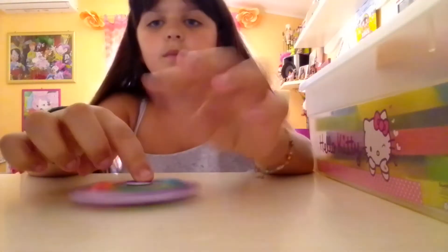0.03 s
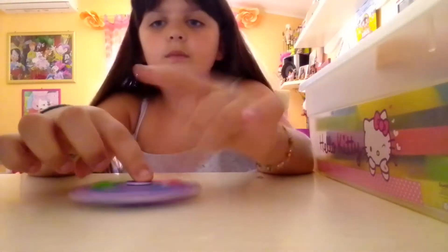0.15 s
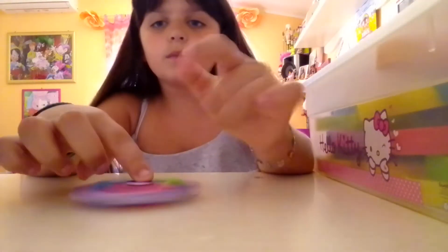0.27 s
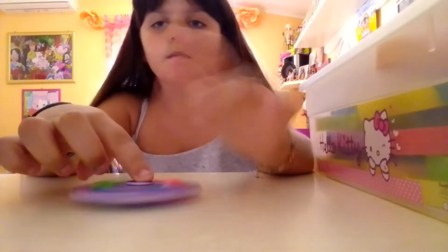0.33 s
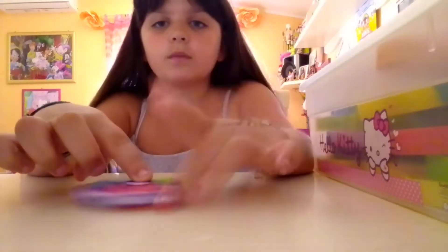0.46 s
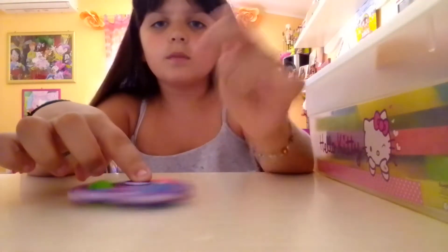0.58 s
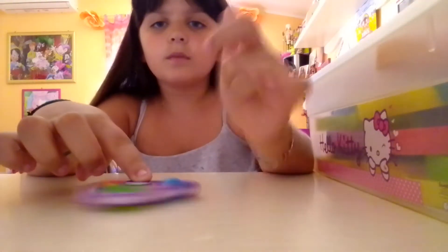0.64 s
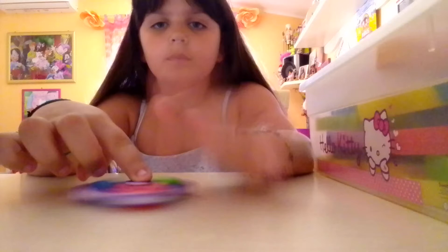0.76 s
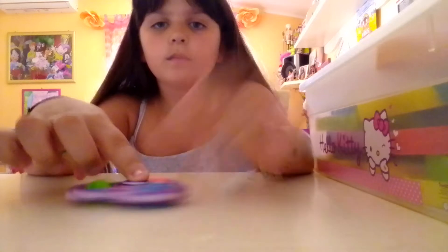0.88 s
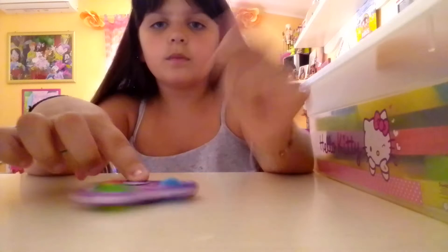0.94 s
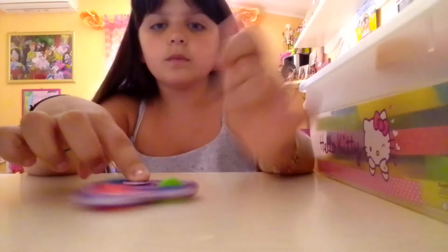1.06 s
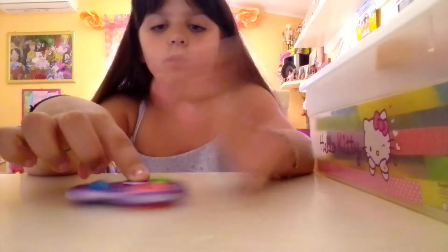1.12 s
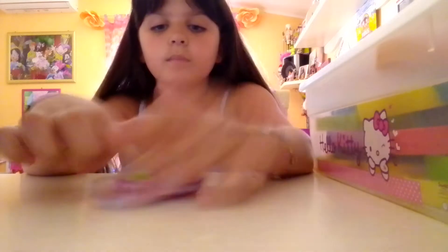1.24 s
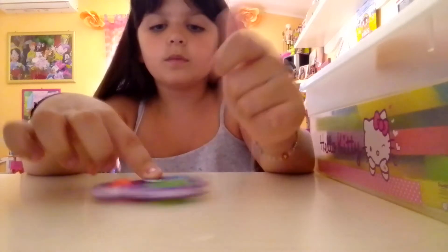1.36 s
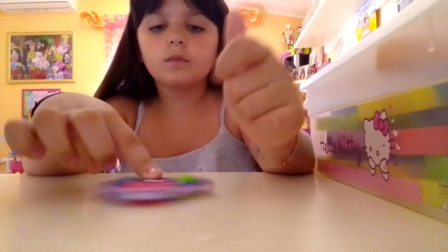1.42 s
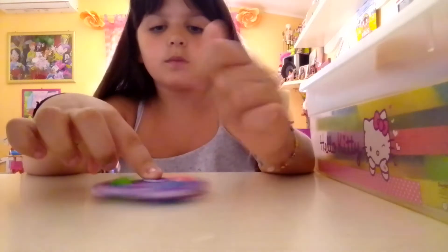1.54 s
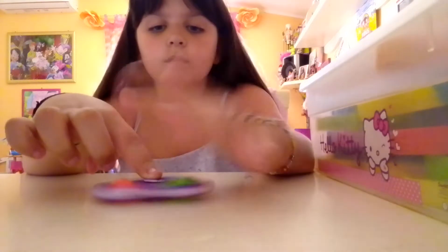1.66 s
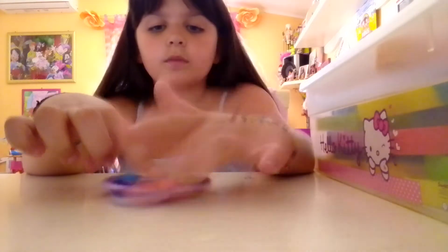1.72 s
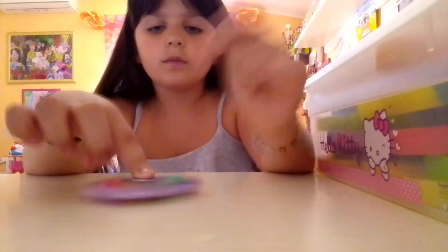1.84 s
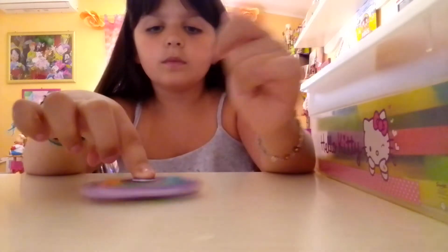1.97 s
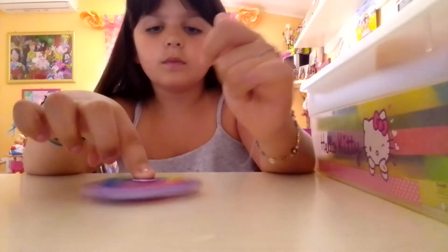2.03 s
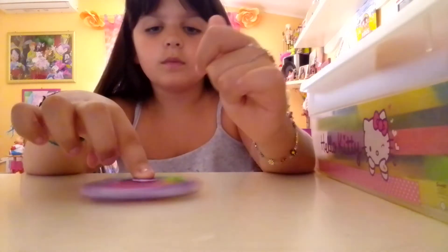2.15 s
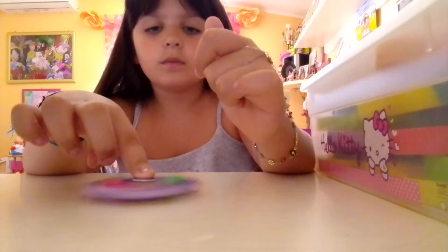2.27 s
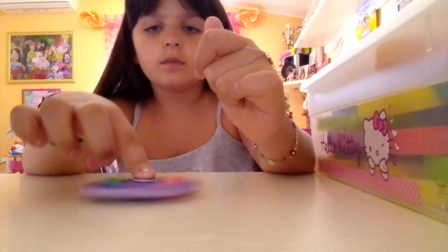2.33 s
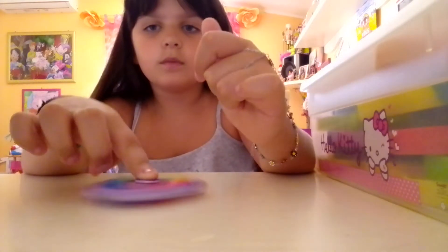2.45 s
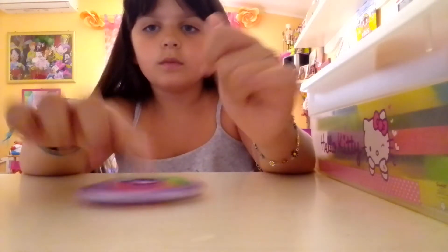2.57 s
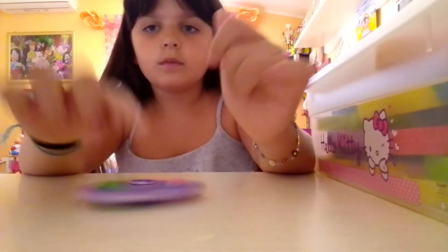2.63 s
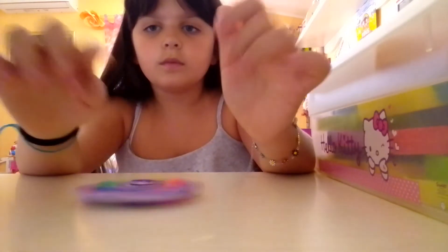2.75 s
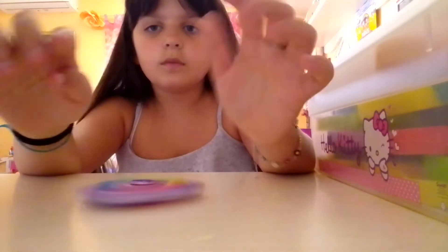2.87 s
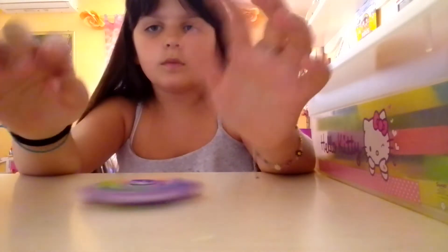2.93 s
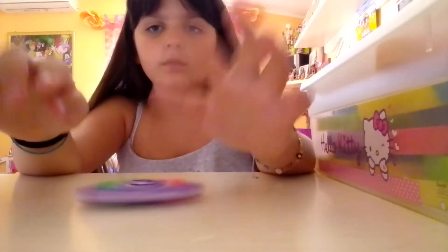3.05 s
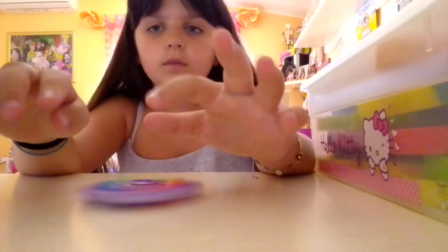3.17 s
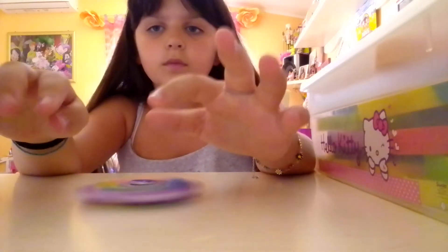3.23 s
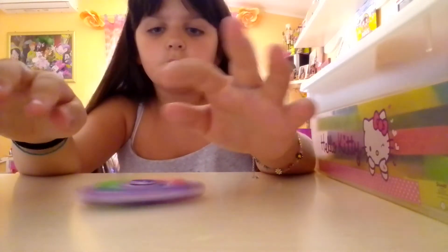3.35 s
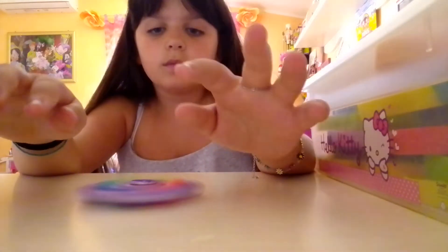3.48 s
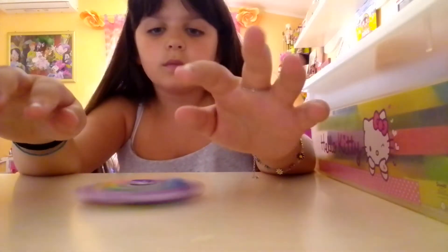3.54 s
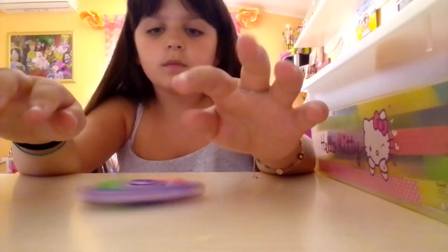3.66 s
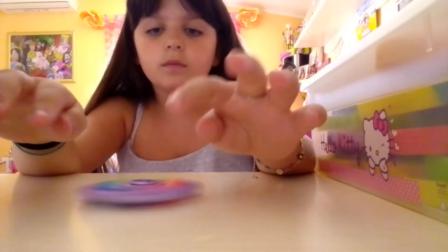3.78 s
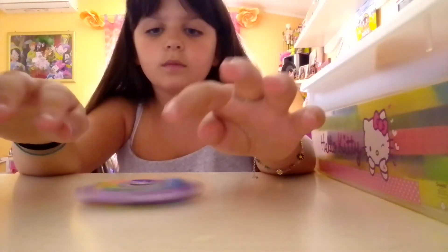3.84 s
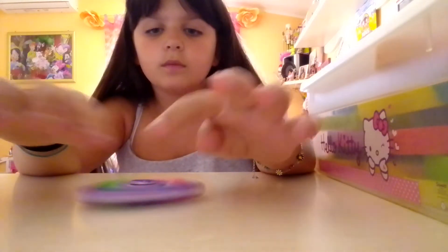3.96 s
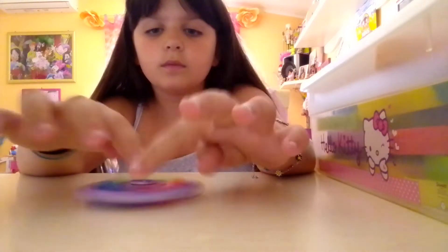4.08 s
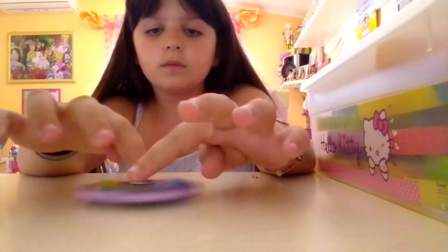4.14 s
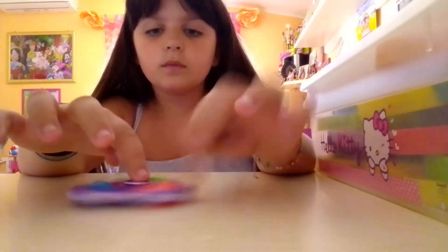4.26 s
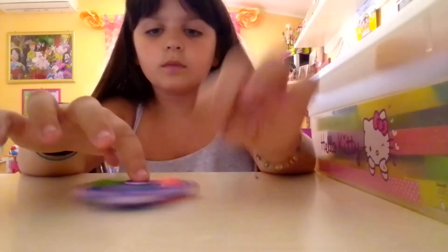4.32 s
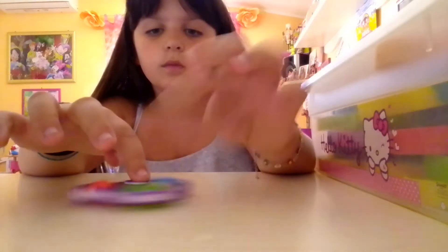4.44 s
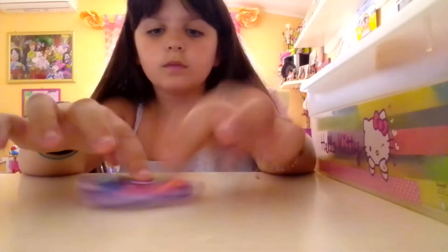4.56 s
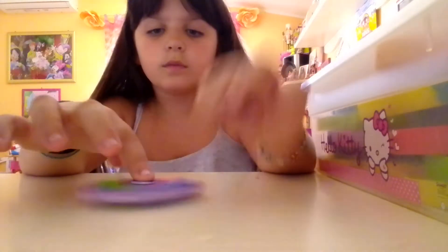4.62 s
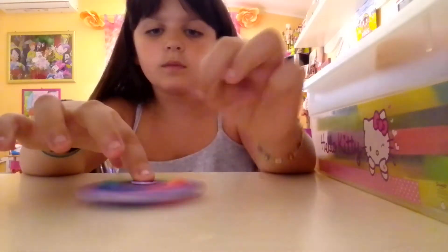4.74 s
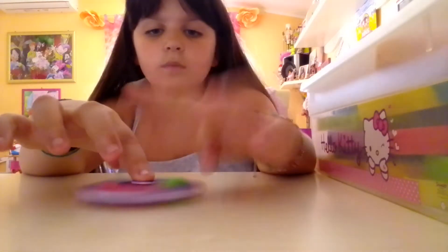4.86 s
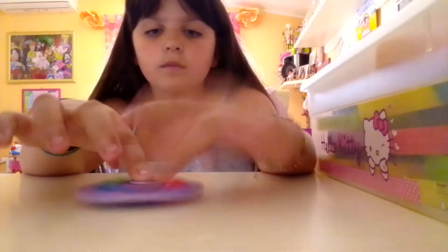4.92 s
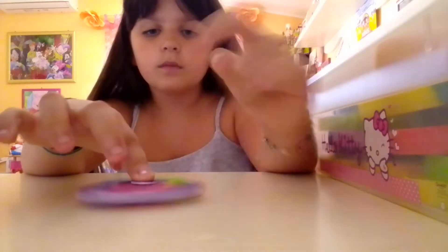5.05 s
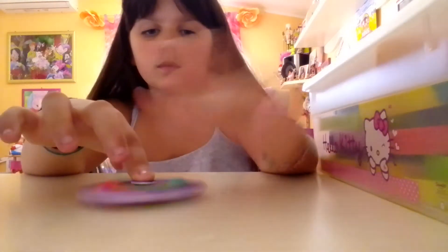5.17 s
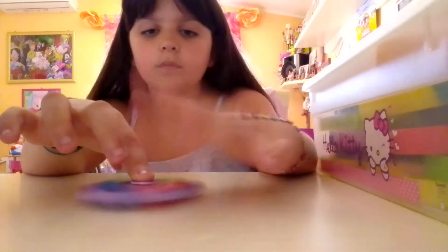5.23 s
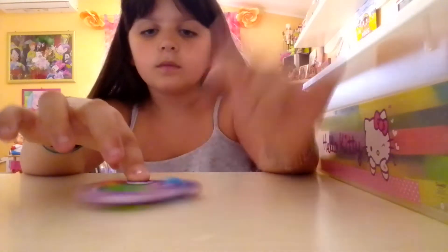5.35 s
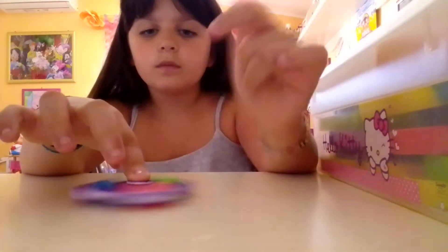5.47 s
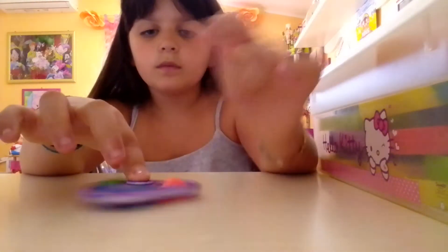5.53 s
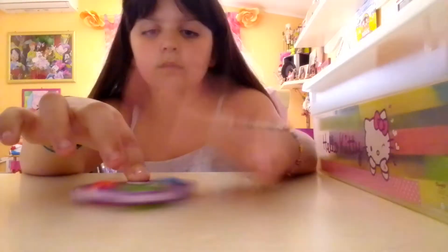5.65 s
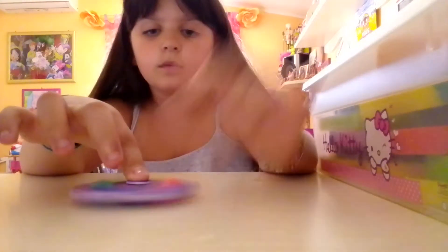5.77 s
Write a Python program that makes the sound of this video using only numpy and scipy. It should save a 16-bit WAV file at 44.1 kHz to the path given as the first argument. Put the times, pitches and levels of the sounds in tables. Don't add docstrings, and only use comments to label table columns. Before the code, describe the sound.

A low, uneven bearing rumble runs throughout, carried by the desk to a microphone resting on it. Light skin brushes lead to a clattering catch, then a loud plastic snap with bouncing rattle. A small landing clatter settles into calm spinning, followed by two pairs of hard flicks, another strike and soft knocks. Short dull room reflections, faint background noise.

```python
import sys
import numpy as np
from scipy import signal
from scipy.fft import rfft, irfft
from scipy.io import wavfile

SR = 44100
rng = np.random.default_rng(int(sys.argv[2]) if len(sys.argv) > 2 else 0)


def volts_from_decibels(level):
    exponent = np.asarray(level, float) / 20
    return 10 ** exponent


def pcm_store(signal):
    levels = np.round(np.clip(np.atleast_2d(signal), -1, 1) * 32767)
    wavfile.write(sys.argv[1], SR, levels.astype(np.int16).T)


N = 255726

# pitch_hz, width_hz, level_db
DESK_LOW_MODES = [(63, 36, -24.5), (152.6, 68, -3.5), (221.4, 42, 8.5), (249, 61, 1), (337.7, 48, 2),
                  (428.3, 44, -3)]
DESK_MID_MODES = [(538, 52, -2.5), (651, 76, -2), (715.4, 51, 0), (956.7, 110, -3.5), (1173, 200, -10.5)]
HUB_MODES = [(1735, 120, -5.5), (1863, 150, 8)]
BALL_MODES = [(3750, 250, -1.5), (4310, 320, 2.5), (4980, 490, -6.5), (2620, 490, -9), (5540, 340, -12),
              (6900, 860, -13.5), (8744, 590, -12)]
WOBBLE_MODES = [(3800, 330, 0), (7200, 450, -4)]


def rms_one(x):
    return x / np.sqrt(np.mean(x ** 2) + 1e-20)


def in_time(rows):
    s, *columns = np.transpose(rows)
    return [np.interp(np.arange(N) / SR, s, c) for c in columns]


def drift(rate_hz):
    hop = 40
    warm_up = 2000
    r = np.exp(-2 * np.pi * rate_hz * hop / SR)
    noise = rng.standard_normal(N // hop + warm_up + 2)
    slow = signal.lfilter([1], [1, -2 * r, r * r], noise)[warm_up:]
    return np.interp(np.arange(N) / hop, np.arange(len(slow)), rms_one(slow))


def resonate(x, modes, strengths_db=None):
    out = 0
    for k, (pitch_hz, width_hz, level_db) in enumerate(modes):
        r = np.exp(-np.pi * width_hz / SR)
        w = 2 * np.pi * pitch_hz / SR
        ring = signal.lfilter([1 - r, 0, r - 1], [1, -2 * r * np.cos(w), r * r], x + 1e-18)
        own = 1 if strengths_db is None else volts_from_decibels(strengths_db[:, k:k + 1])
        out = out + (-1) ** k * volts_from_decibels(level_db) * own * ring
    return out


def band(x, low_hz, high_hz):
    return signal.sosfilt(signal.butter(2, [low_hz, high_hz], "band", fs=SR, output="sos"), x)


def room_noise():
    # pitch_hz, density_db (per Hz)
    spectrum = [(15, -56.5), (25, -27), (59, -24), (270, -23.5), (363, 0.5), (489, -14.5), (796, -33.5),
                (1370, -43), (1840, -37), (3080, -47), (4370, -57.5), (5280, -51.5), (16000, -53)]
    hz = np.maximum(np.fft.rfftfreq(N, 1 / SR), 1)
    point_hz, point_db = np.transpose(spectrum)
    shape = volts_from_decibels(np.interp(np.log(hz), np.log(point_hz), point_db))
    noise = irfft(rfft(rng.standard_normal(N)) * shape, N)
    return volts_from_decibels(-59.5) * rms_one(noise)


def rolling_balls(body_db, hiss_db, lumps):
    load_db = body_db - body_db.mean()
    spin_db = hiss_db - hiss_db.mean()
    hum_db = -54.0 + 0.45 * load_db
    ring_db = -70.5 + 1.2 * load_db + 0.58 * spin_db
    force = rng.standard_normal((4, N))
    hum = resonate(force[0], [(378.6, 24.7, 4.5), (210, 50, -11.5), (236.0, 17, -24), (146, 130, -16.5)])
    body = band(band(resonate(force[1], DESK_MID_MODES), 520, 950), 300, 1200)
    ring = band(band(resonate(force[2], HUB_MODES), 1650, 2100), 1600, 2050)
    hiss = resonate(force[3], BALL_MODES)
    # sound, level_db, depth of the lumps in dB
    parts = [(hum, hum_db - 0.1, 2.5),
             (body, body_db - 3.07, 1.6),
             (ring, ring_db - 3.5, 2.2),
             (hiss, hiss_db, 1.6)]
    return sum(rms_one(x) * volts_from_decibels(level_db + lump_db * lumps) for x, level_db, lump_db in parts)


def cage_chatter(hiss_db):
    # pitch_hz, width_hz, level_db
    cage_modes = [(9300, 220, 2), (11500, 300, -2)]
    chatter = rms_one(resonate(rng.standard_normal(N), cage_modes))
    return chatter * volts_from_decibels(hiss_db - 19 + 7.5 * drift(30))


def hub_wobble(lumps):
    start_s, rise_s, fade_s = 2.58, 0.051, 0.15
    since_s = np.arange(N) / SR - start_s
    fade = np.clip(since_s / rise_s, 0, 1) * np.exp(-np.maximum(since_s, 0) / fade_s)
    wobble = resonate(resonate(rng.standard_normal(N), WOBBLE_MODES), WOBBLE_MODES)
    return rms_one(wobble) * fade * volts_from_decibels(-66 + 3.0 * lumps)


def bearing():
    # time_s, load passed to the desk (body_db), free spin of the balls (hiss_db)
    roll = [(0.0, -65.5, -82), (0.4, -60.5, -82), (0.6, -62.5, -94), (0.92, -57.5, -89), (1.15, -67, -87),
            (1.33, -49, -65), (1.5, -57, -90.5), (1.72, -62, -82.5), (1.9, -49, -76), (2.55, -62.5, -77.5),
            (2.85, -57.5, -75), (3.6, -60.5, -76.5), (3.85, -73, -77.5), (4.15, -73, -77), (4.3, -61, -98),
            (4.96, -49.5, -77.5), (5.47, -56.5, -88.5), (5.8, -51.5, -84.5)]
    body_db, hiss_db = in_time(roll)
    lift_at_s, lift_s, lift_db = 2.9, 0.025, -16
    body_db = body_db + lift_db * np.exp(-((np.arange(N) / SR - lift_at_s) / lift_s) ** 2)
    lumps = drift(20)
    return rolling_balls(body_db, hiss_db, lumps) + cage_chatter(hiss_db) + hub_wobble(lumps)


def rubbing():
    # pitch_hz, width_hz, level_db
    skin_modes = [(2900, 1954, 3.5), (4350, 1100, -1), (7200, 4000, 2.5), (13300, 3600, -12)]
    # start_s, length_s, hiss_db, desk_drag_db, hub_drag_db
    brushes = [(0.125, 0.14, -75, -45.5, -91), (0.44, 0.042, -72.5, -41, -82),
               (0.625, 0.1, -78.5, -80, -98), (0.747, 0.051, -67, -78, -55.5),
               (0.806, 0.14, -80, -40.5, -63.5), (0.815, 0.052, -68, -59, -56.5),
               (1.074, 0.027, -61.5, -59, -56.5), (2.539, 0.058, -65.5, -43.5, -77),
               (4.176, 0.059, -65.5, -60, -65.5), (4.502, 0.18, -59, -60, -73),
               (1.687, 0.11, -64, -56, -70), (5.252, 0.065, -62, -47, -42.5), (4.89, 0.16, -63.5, -41, -52),
               (5.653, 0.1, -68.5, -40.5, -55.5)]
    # start_s, length_s, hiss_db, desk_drag_db, dull_edge_hz
    wipes = [(1.206, 0.087, -58, -73, 9400), (1.26, 0.16, -46.5, -45.5, 7600),
             (1.438, .06, -67.5, -51, 7350), (1.688, 0.083, -54.5, -65, 9700),
             (1.738, 0.017, -40, -31, 9400), (1.756, 0.15, -45.5, -51, 9800), (4.168, 0.08, -54, -52, 8500),
             (4.251, 0.052, -73, -47.5, 8000), (4.496, 0.074, -43.5, -41, 10200),
             (4.57, 0.13, -49.5, -49.5, 9300), (5.215, 0.21, -57, -39, 5960),
             (5.269, 0.066, -53, -67, 9500)]
    grains = rng.standard_normal((3, N)) * volts_from_decibels(4.0 * drift(70))
    skin = rms_one(resonate(grains[0], skin_modes))
    desk = rms_one(band(resonate(grains[1], DESK_LOW_MODES + DESK_MID_MODES[:2]), 83, 794))
    hub = rms_one(band(resonate(grains[2], HUB_MODES), 1600, 2000))
    slides = [(*brush, 15500) for brush in brushes]
    for start_s, length_s, hiss_db, desk_db, dull_hz in wipes:
        slides.append((start_s, length_s, hiss_db, desk_db, hiss_db - 11.5, dull_hz))
    out = np.zeros(N + SR)
    for start_s, length_s, hiss_db, desk_db, hub_db, dull_hz in slides:
        span = slice(round(start_s * SR), round((start_s + length_s) * SR))
        edge = signal.cheby2(6, 15, min(dull_hz, 0.45 * SR), fs=SR, output="sos")
        hiss = volts_from_decibels(hiss_db) * signal.sosfilt(edge, skin[span])
        slide = hiss + volts_from_decibels(desk_db) * desk[span] + volts_from_decibels(hub_db) * hub[span]
        along = np.linspace(0, 1, len(slide))
        out[span] += slide * np.minimum(along / 0.1, 1) * (1 - along ** 1.5)
    return out[:N]


def strike(times_s, levels_db, modes, burst_s, rise_s, grit_db, edges_hz, spread_db, lag_s=0., tilt_db=0.):
    count, size = len(times_s), 6000
    t = np.arange(size) / SR
    spray = rng.standard_normal((count, size)) * volts_from_decibels(grit_db * rng.standard_normal((count, size)))
    settle_db, settle_s = -11.5, 0.0076
    shape = np.exp(-t / burst_s) + volts_from_decibels(settle_db) * np.exp(-t / settle_s)
    spray = spray * shape * (1 - np.exp(-t / rise_s))
    strengths_db = spread_db * rng.standard_normal((count, len(modes))) + tilt_db * np.arange(len(modes))
    rings = band(resonate(spray, modes, strengths_db), *edges_hz)
    rings = rings / np.abs(rings).max(axis=1, keepdims=True) * volts_from_decibels(levels_db)[:, None]
    out = np.zeros(N + 2 * size)
    for s, ring in zip(times_s, rings):
        at = round((s + lag_s) * SR)
        out[at:at + size] += ring
    return out[:N]


def desk_thump(s, thump_db, sizes):
    # change from one desk mode to the next, tilt_db
    thump_tilt = [2.5, -1, -1.8, -0.14, 1.1, 0.5]
    tilt_db = np.repeat(thump_tilt, sizes)[:, None]
    return strike(s, thump_db + 1.0, DESK_LOW_MODES, 0.0043, 0.0015, 1.6, (45, 560), 1.0, -0.002, tilt_db)


def desk_knock(s, knock_db, sizes):
    # change from one desk mode to the next, tilt_db
    knock_tilt = [0.1, -1.5, -.6, -1.5, -2.2, -.6]
    tilt_db = np.repeat(knock_tilt, sizes)[:, None]
    return strike(s, knock_db + 0.5, DESK_MID_MODES, 0.0011, 0.0005, 5.6, (420, 1060), 1.2, -0.0015, tilt_db)


def hub_ring(s, crack_db, knock_db, sizes):
    # ring of the hub, level_db
    ring_by_kind = [-14.5, -13, -9, -15, -7, -9]
    ring_db = 0.37 * crack_db + 0.52 * knock_db + np.repeat(ring_by_kind, sizes)
    return strike(s, ring_db + 1.5, HUB_MODES, 0.0018, 0.0006, 3.0, (1600, 2200), 1.5)


def lobe_crack(s, crack_db):
    # pitch_hz, width_hz, level_db
    lobe_modes = [(1510, 300, -12), (2816, 530, 1.5), (3980, 510, 4), (5060, 1100, 0), (6400, 1500, 2.5),
                  (7387, 1500, -0.5)]
    return strike(s, crack_db - 1.0, lobe_modes, 0.0019, 0.0004, 5.0, (1250, 7600), 1.8)


def edge_tick(s, crack_db, sizes):
    # pitch_hz, width_hz, level_db
    edge_modes = [(8570, 540, 4), (11400, 1500, -7), (14000, 4300, -16)]
    # hardness of the tick, level_db
    hardness = [-20.5, -44.5, -22, -23.5, -12, -14.5]
    tick_db = 0.88 * crack_db + np.repeat(hardness, sizes)
    return strike(s, tick_db + 4, edge_modes, 0.0022, 0.0004, 4.5, (8000, 16500), 1.5)


def landing_clatter(landings):
    s, snap_db, *_ = np.transpose(landings)
    return strike(s, snap_db + 4, WOBBLE_MODES + BALL_MODES[1:3], 0.002, 0.0005, 3.0, (3300, 9000), 3.2)


def contacts():
    # time_s, snap of plastic snap_db, push into desk push_db, knock on desk knock_db
    flicks = [(1.6824, -19, -18, -20), (1.6926, -30, -30, -25), (1.7532, -9, -33.5, -19.5),
              (4.174, -26.5, -29, -39.5), (4.1798, -22.5, -32.5, -33.5), (4.4916, -14.5, -19, -22),
              (4.4985, -15, -35, -19.5), (4.5083, -25.5, -46.5, -18.5), (4.5469, -14, -23.5, -25),
              (4.5528, -22, -27, -51), (5.225, -19, -19.5, -18.5), (5.2369, -34, -28, -27)]
    catches = [(1.195, -32, -28.5, -26), (1.2476, -30.5, -33.5, -30.5), (1.2555, -33.5, -37, -27),
               (1.276, -20, -31.5, -25.5), (1.2857, -26, -35.5, -47), (1.3128, -23, -35.5, -35),
               (1.3293, -30, -30, -33.5), (1.3424, -30, -31.5, -33.5), (1.3492, -27.5, -42.5, -32),
               (1.3588, -36, -34.5, -43), (1.3686, -41, -56, -46.5)]
    bounces = [(1.7645, -28.5, -27.5, -41), (1.7834, -23.5, -28, -45), (1.8053, -25.5, -30, -38.5),
               (1.8109, -32, -31, -46), (1.8203, -25, -28, -28.5), (1.8336, -35.5, -30, -33),
               (1.849, -55, -30.5, -42), (4.2354, -44.5, -32.5, -50), (4.2705, -55.5, -44, -49),
               (4.521, -33.5, -42.5, -63), (4.5648, -28, -28, -62), (4.608, -36, -35, -61),
               (4.626, -47, -64, -65), (4.6383, -53, -32, -41.5), (5.2592, -38, -24.5, -30.5),
               (5.2757, -42, -32, -36.5), (5.2876, -47, -34.5, -47), (5.316, -72, -31, -63)]
    nudges = [(0.146, -59, -33.5, -73), (0.1553, -61, -34, -75), (0.4162, -67, -33, -47),
              (0.4462, -73, -34, -58), (0.629, -76, -65, -65), (0.7191, -48.5, -76, -57),
              (0.7344, -50, -64, -63), (0.755, -50, -59, -48), (0.79, -66, -38.5, -44),
              (0.8255, -63, -36, -45.5), (0.832, -60, -28.5, -47), (0.8674, -68, -40, -56),
              (1.056, -52.5, -72, -60), (1.078, -61, -68, -74), (1.177, -51, -31, -40),
              (1.436, -73, -43.5, -41.5), (1.4646, -45.5, -66, -48.5), (1.9294, -56, -61, -40.5),
              (1.9765, -54, -43.5, -60), (4.7185, -52, -54.5, -48.5), (4.8757, -72, -43, -48),
              (4.909, -49.5, -31, -41), (4.9866, -66, -38, -44), (5.0414, -76, -39, -43),
              (5.653, -57, -27, -41.5), (5.671, -50, -30, -37.5), (5.7087, -68, -31, -37)]
    landings = [
        (2.54, -46.5, -27, -41),
        (2.5533, -46, -40, -34),
        (2.5718, -53, -30, -48),
        (2.584, -47, -29, -33),
        (2.5961, -50, -41, -41),
        (2.608, -44, -33, -34),
        (2.628, -70, -45, -55),
        (2.697, -70, -39, -42.5),
        (2.7664, -88, -39.5, -48),
        (2.7997, -81, -41.5, -48),
    ]
    # time_s, snap_db
    nail_ticks = [(1.1084, -62), (1.1955, -37.5), (1.572, -73), (1.599, -65), (2.2563, -67.5), (4.107, -66),
                  (4.651, -48), (5.0918, -61.5), (5.1423, -74.5), (5.315, -49), (5.494, -63.5),
                  (5.5193, -69), (5.797, -69)]
    ticks = [(s, db, db - 10.5, db - 10.5) for s, db in nail_ticks]
    kinds = [flicks, catches, bounces, nudges, landings, ticks]
    sizes = [len(kind) for kind in kinds]
    s, crack_db, thump_db, knock_db = np.transpose(sum(kinds, []))
    air = lobe_crack(s, crack_db) + edge_tick(s, crack_db, sizes) + landing_clatter(landings)
    desk = desk_thump(s, thump_db, sizes) + desk_knock(s, knock_db, sizes)
    return air, desk + hub_ring(s, crack_db, knock_db, sizes)


def room(x):
    t60_s, rise_s = 0.41, 0.011
    t = np.arange(SR // 2) / SR
    tail = rng.standard_normal(len(t)) * volts_from_decibels(-60 * t / t60_s) * (1 - np.exp(-t / rise_s))
    tail = band(tail / np.sqrt(np.sum(tail ** 2)), 100, 5300)
    tail = signal.sosfilt(signal.butter(8, 9600, fs=SR, output="sos"), tail)
    return signal.fftconvolve(x, tail)[:N]


def scene():
    crack, desk = contacts()
    air = crack + rubbing()
    echo = volts_from_decibels(-15) * room(air + volts_from_decibels(4.0) * desk)
    return (air + desk + echo + bearing() + room_noise())[None]


def roll_off(x):
    return signal.sosfilt(signal.butter(12, 16510, fs=SR, output="sos"), x)


def record(dry):
    dull = signal.sosfilt(signal.cheby2(10, 30, 16300, fs=SR, output="sos"), dry)
    return roll_off(dull)


dry = scene()
out = record(dry)
pcm_store(out)
```